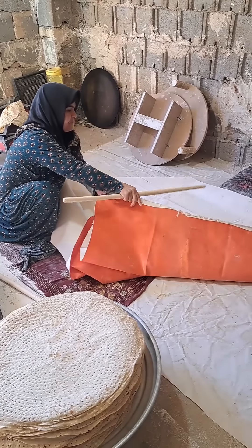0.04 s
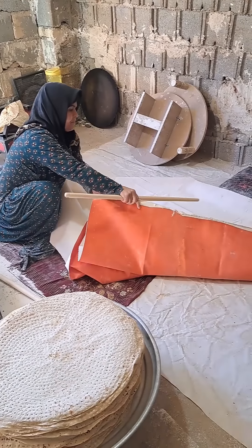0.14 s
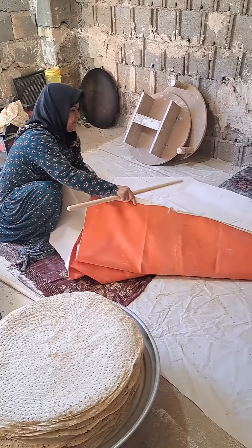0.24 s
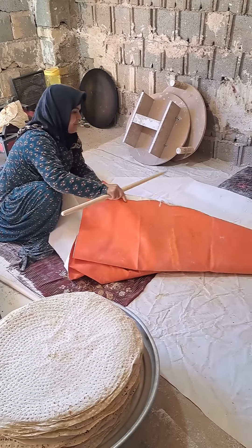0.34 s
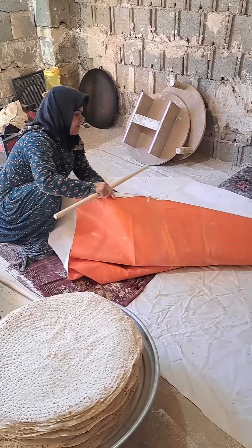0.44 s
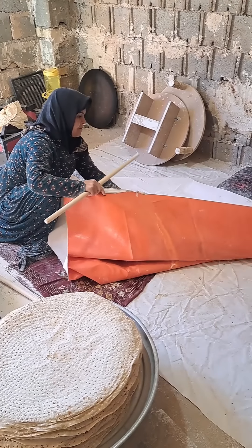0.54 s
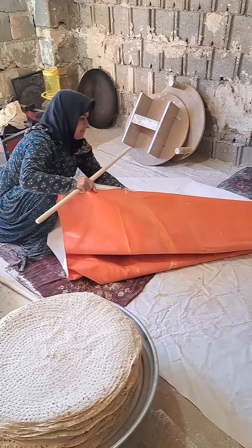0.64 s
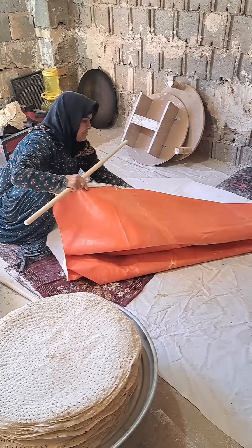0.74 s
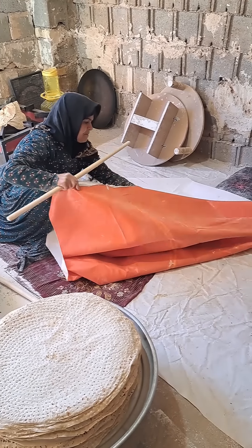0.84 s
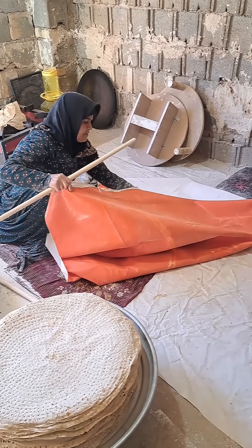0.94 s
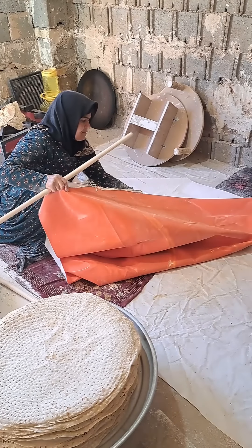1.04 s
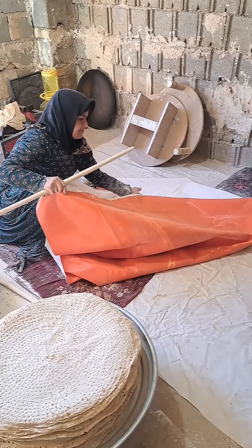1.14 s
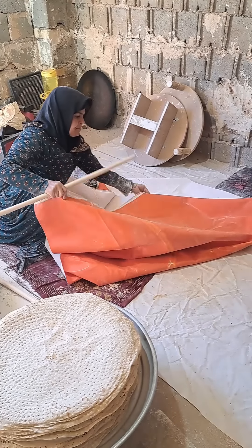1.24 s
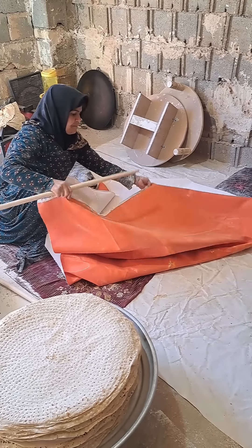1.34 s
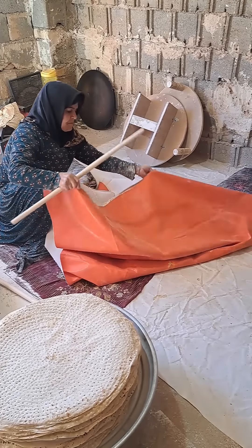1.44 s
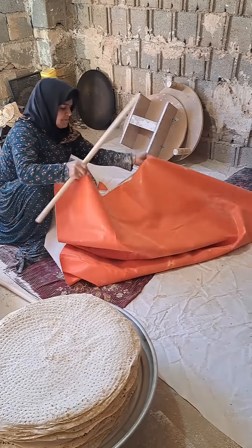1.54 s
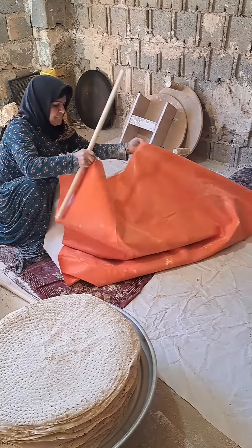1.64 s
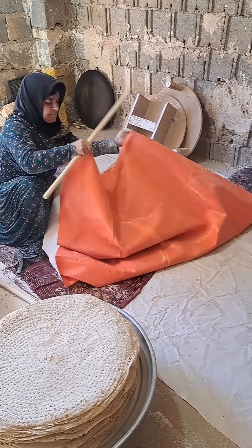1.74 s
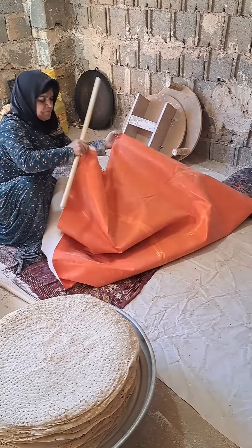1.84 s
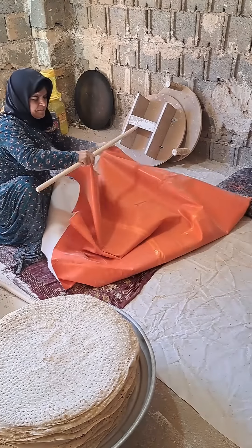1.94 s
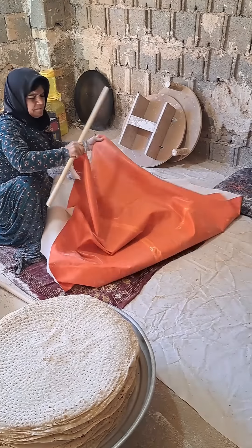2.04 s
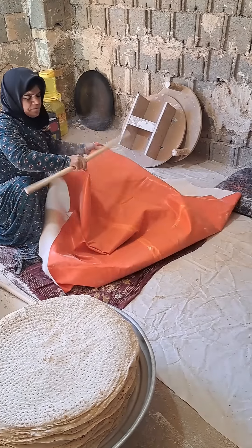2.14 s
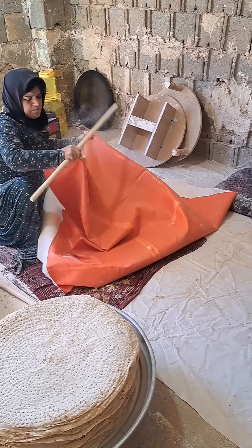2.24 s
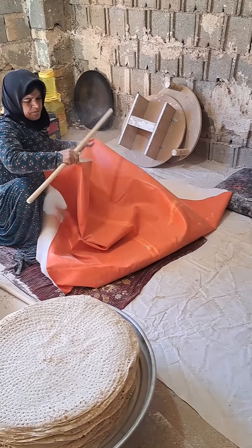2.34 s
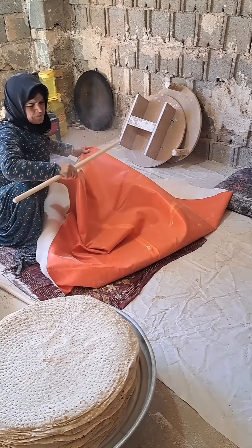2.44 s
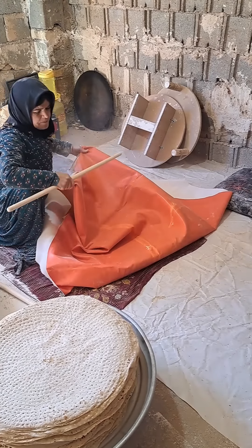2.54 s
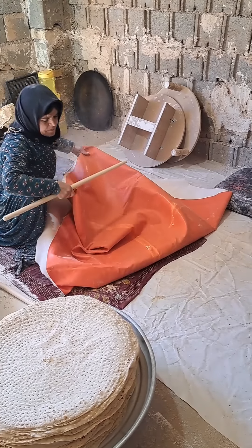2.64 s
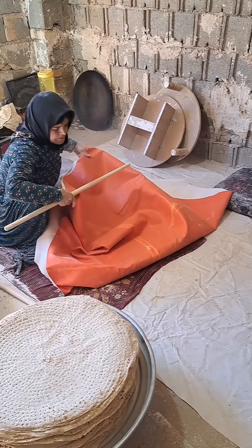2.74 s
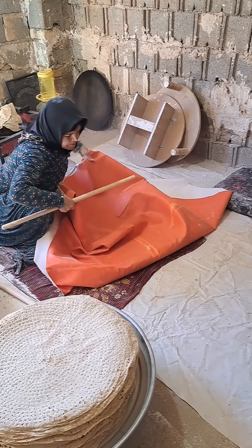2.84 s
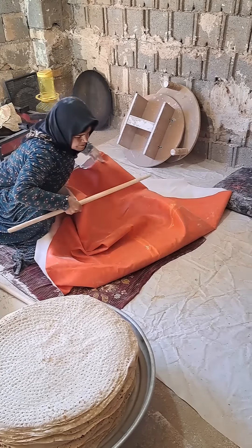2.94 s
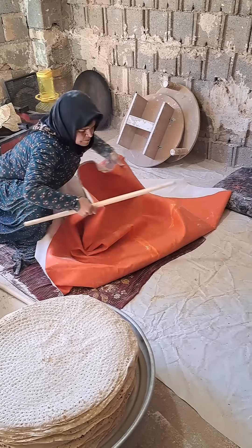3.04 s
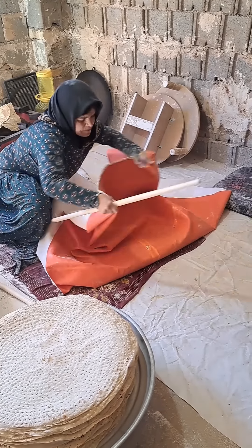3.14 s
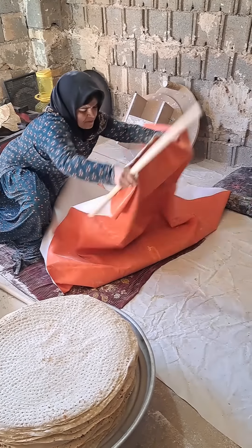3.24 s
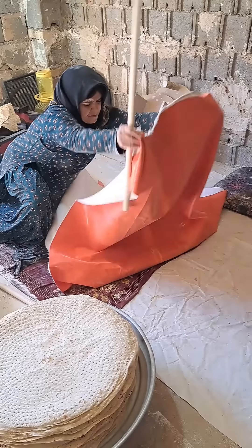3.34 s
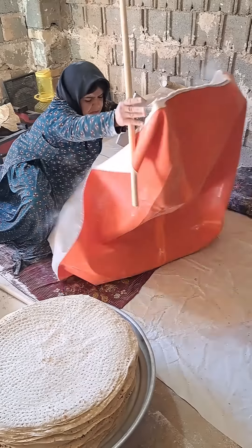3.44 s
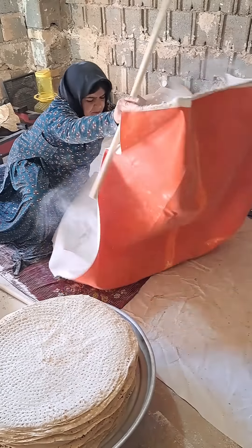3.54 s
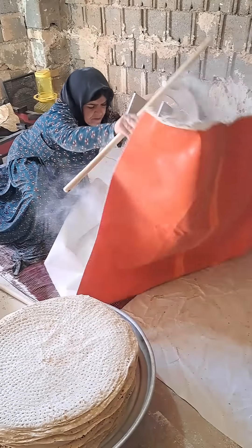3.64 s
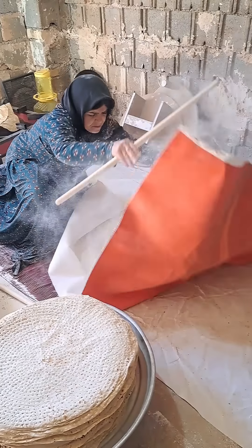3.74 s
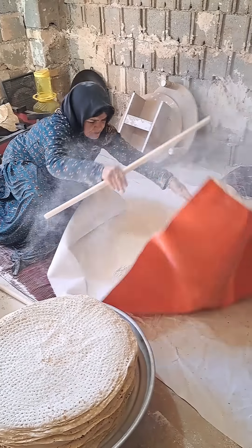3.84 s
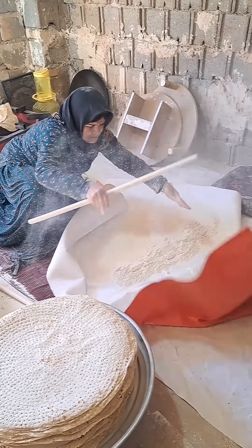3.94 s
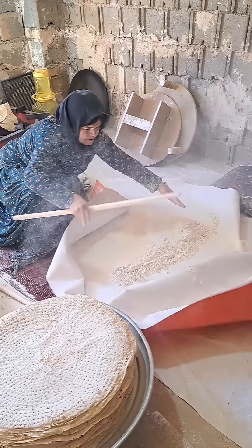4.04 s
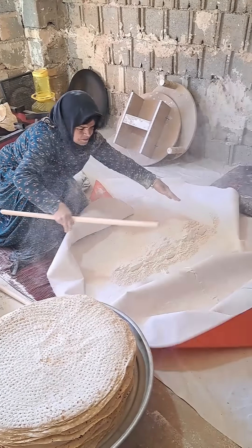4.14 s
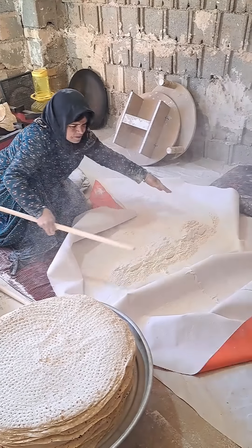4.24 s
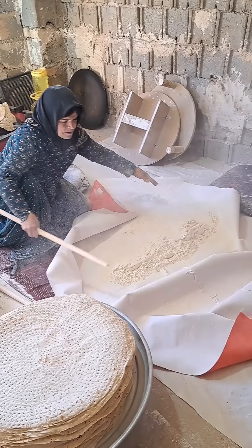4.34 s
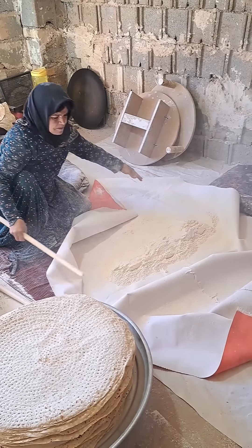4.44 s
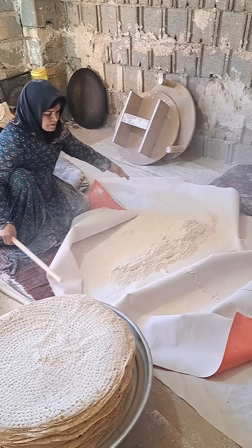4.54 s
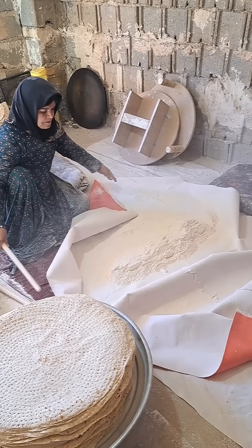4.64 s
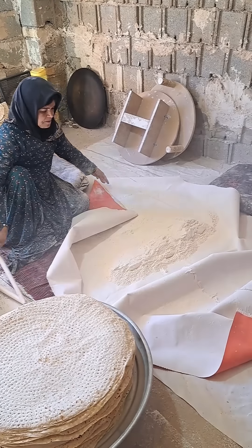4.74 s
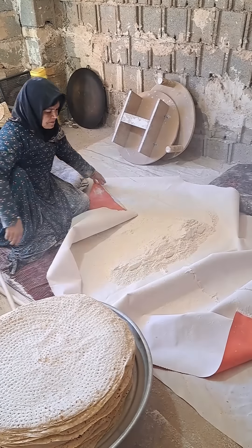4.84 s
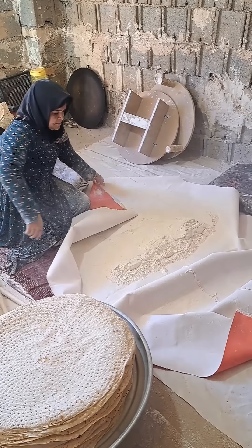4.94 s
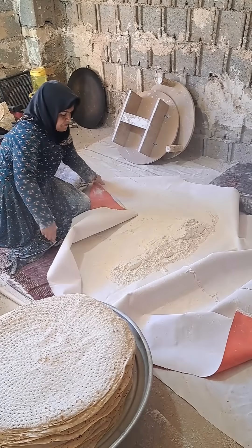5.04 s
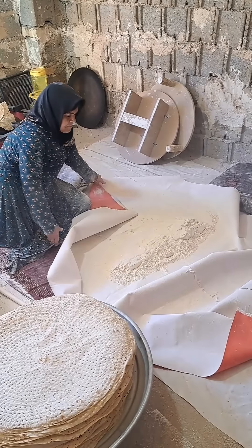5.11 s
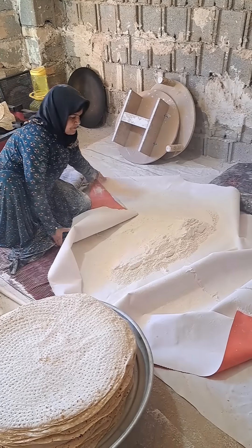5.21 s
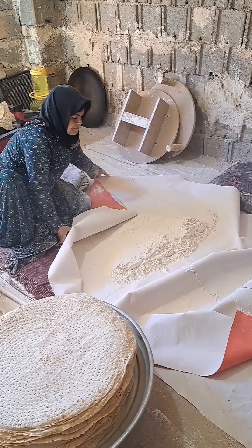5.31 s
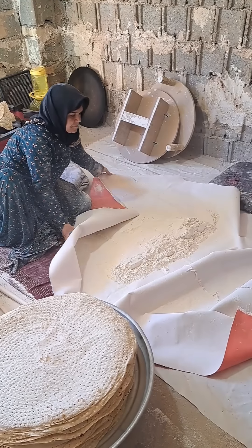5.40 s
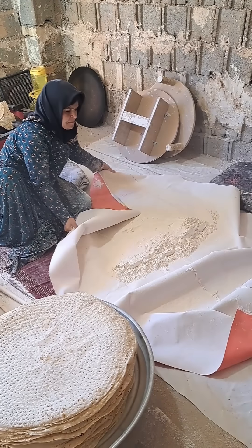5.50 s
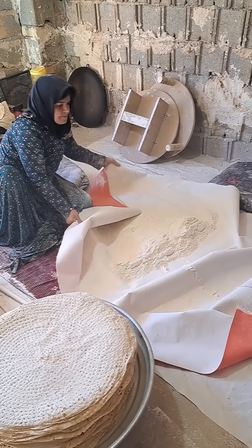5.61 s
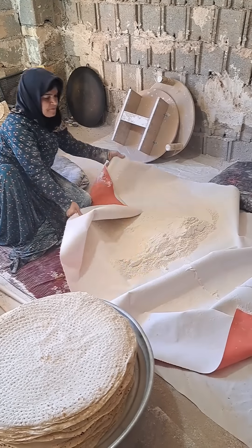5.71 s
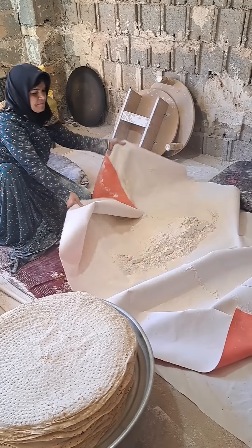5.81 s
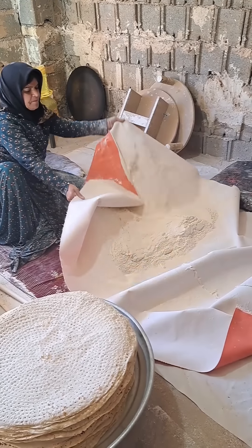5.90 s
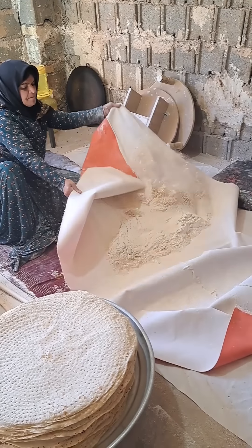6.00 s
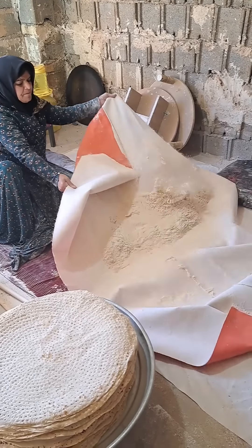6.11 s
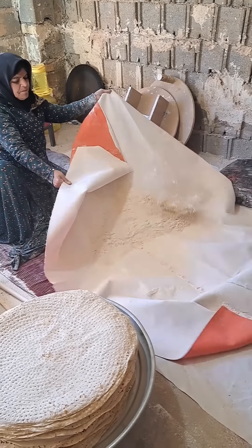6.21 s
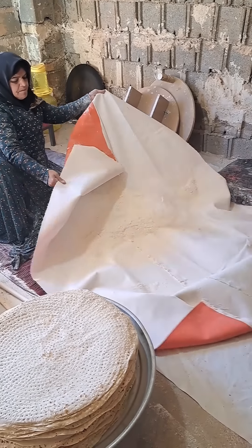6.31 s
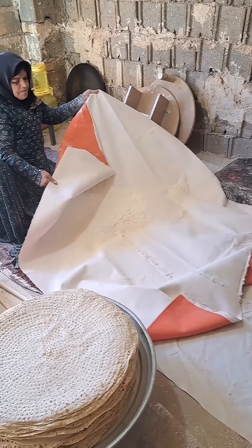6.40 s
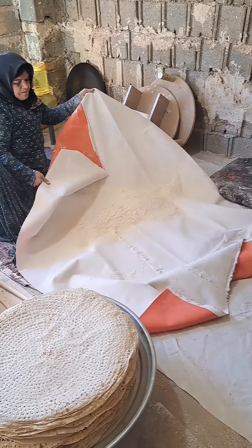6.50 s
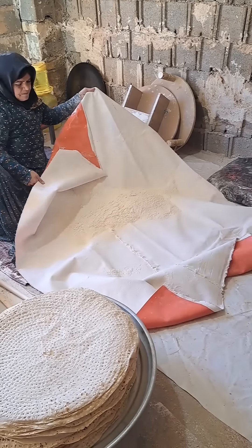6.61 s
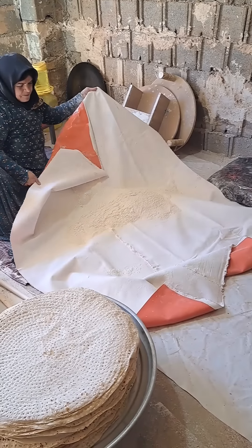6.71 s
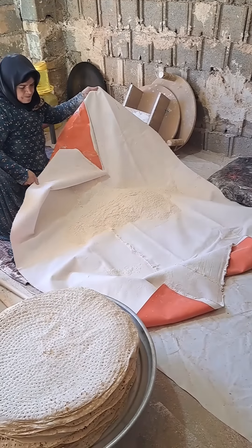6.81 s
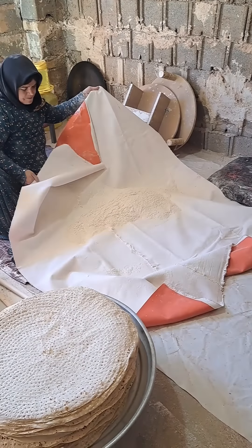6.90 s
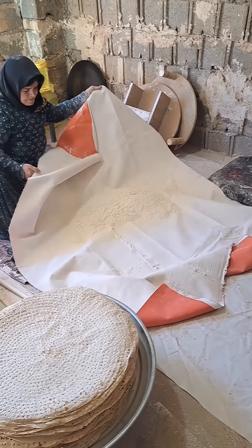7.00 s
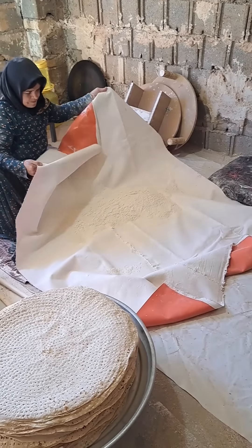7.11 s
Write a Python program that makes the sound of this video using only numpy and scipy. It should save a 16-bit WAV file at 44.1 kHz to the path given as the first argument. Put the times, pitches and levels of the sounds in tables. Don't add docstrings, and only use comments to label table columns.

```python
import sys
import numpy as np
from scipy import signal
from scipy.fft import rfft, irfft, next_fast_len
from scipy.io import wavfile

SR = 44100
rng = np.random.default_rng(int(sys.argv[2]) if len(sys.argv) > 2 else 0)


def put_to_file(sound):
    columns = np.atleast_2d(sound).T
    safe = np.clip(columns, -1, 1)
    whole_steps = np.round(safe * 32767)
    wavfile.write(sys.argv[1], SR, whole_steps.astype(np.int16))


def boost_factor(decibels):
    exponent = np.asarray(decibels, float) / 20
    return 10 ** exponent


N = 315756


def rms_one(x):
    return x / np.sqrt(np.mean(x ** 2) + 1e-20)


def band_pass(order, low_hz, high_hz):
    return signal.butter(order, [low_hz, high_hz], "band", fs=SR, output="sos")


def toward_right(db):
    return boost_factor(np.array([[-db], [db]]))


def at_hz(points, hz):
    table_hz, value = np.transpose(points)
    return np.interp(np.log(hz), np.log(table_hz), value)


def drift(rate):
    r = np.exp(-80 * np.pi * rate / SR)
    noise = rng.standard_normal(N // 40 + 2002)
    return rms_one(signal.lfilter([1], [1, -2 * r, r * r], noise)[2000:])


def wander(db):
    return np.interp(np.arange(N) / 40, np.arange(len(db)), boost_factor(db))


def swells(s, rise, fall, peak_db, roundness):
    age = np.arange(N // 40 + 2)[:, None] * 40 / SR - s
    away = np.where(age < 0, -age / rise, age / fall) ** roundness
    power = np.sum(boost_factor(2 * (peak_db - 10 * away)), axis=1)
    return 10 * np.log10(power + 1e-14)


def ring(clicks, hz, t60):
    r, w = boost_factor(-60 / (t60 * SR)), 2 * np.pi * hz / SR
    return signal.lfilter([0, np.sin(w)], [1, -2 * r * np.cos(w), r * r], clicks + 1e-18)


def grains(per_s, spread_db):
    chance = rng.random((2, 2, N)) * SR / per_s
    size = rng.standard_normal((2, 2, N))
    rarity = np.minimum(-np.log(chance + 1e-9), 2.5)
    return rms_one(size * np.where(chance < 1, boost_factor(spread_db * rarity), 0))


def colour(source, spectrum, patchy_db, rate):
    # pitch in Hz, likeness from 0 to 1.
    likeness = [(60, 0.25), (180, 1), (550, 0.31), (1650, 0.017), (4970, 0.0096), (15000, 0.01)]
    # pitch in Hz, left minus right in dB.
    lean = [(60, 0), (150, -2), (380, -1.5), (950, -2), (2400, -3), (6000, -3.5), (15000, -2.5)]
    out, together = 0, drift(rate)
    edges = 28 * 2 ** np.arange(0, 9.4, 1 / 3)
    for k, (low, high) in enumerate(zip(edges, edges[1:])):
        hz = np.sqrt(low * high)
        if spectrum[0][0] / 1.3 < hz < spectrum[-1][0] * 1.3:
            mid, side = signal.sosfilt(band_pass(2, low, high), source[k % 2])
            alike = np.clip(at_hz(likeness, hz), -1, 1)
            stereo = np.sqrt(1 + alike) * mid + np.sqrt(1 - alike) * side * [[1], [-1]]
            flicker_db = patchy_db * (0.55 * together + drift(rate))
            gain = wander(at_hz(spectrum, hz) + flicker_db)
            out = out + gain * toward_right(-at_hz(lean, hz) / 2) * stereo
    return rms_one(out)


def background():
    # pitch in Hz, level in dB.
    floor = [(18, -39), (30, -13), (280, -0.5), (486, -27), (780, 0), (988, -4), (1220, -11), (1430, 4),
             (1590, -5.5), (2290, -38), (3490, -15.5), (5040, -7), (8980, -11), (12600, -18), (16000, -25)]
    # pitch in Hz, width in Hz, level in dB.
    whistles = [(802, 28, -73), (1115, 25, -75), (1416, 59, -68.5), (3270, 65, -79), (3980, 55, -74),
                (4400, 60, -95), (4820, 37, -74), (5100, 140, -71), (5700, 57, -72), (6060, 60, -75),
                (6310, 26, -75), (6550, 50, -91)]
    out = boost_factor(-61.5) * colour(rng.standard_normal((2, 2, N)), floor, patchy_db=0.6, rate=3)
    jet = rng.standard_normal((2, N))
    for hz, width_hz, level_db in whistles:
        t60 = np.log(1000) / np.pi / width_hz
        out = out + wander(level_db + 1.5 * drift(0.96)) * rms_one(ring(jet, hz, t60))
    notch_hz, sharpness = 3500, 12
    return signal.lfilter(*signal.iirnotch(notch_hz, sharpness, fs=SR), out)


def hand_motion():
    # fastest at in seconds, rise in seconds, fall in seconds, sliding hiss in dB, crease crackle in
    # dB.
    hand_moves = [(.04, 0.34, 0.1, -50.5, -50.5), (.12, 0.056, 0.073, -52, -51), (.32, 0.1, 0.17, -50.5, -47.5),
                  (.44, 0.11, 0.058, -63, -51), (.57, 0.098, 0.054, -61.5, -54), (.77, 0.076, 0.14, -52.5, -51.5),
                  (.95, 0.11, 0.16, -54, -50), (1.21, 0.086, 0.11, -60, -54.5), (1.44, 0.15, 0.073, -60, -57),
                  (1.70, 0.16, 0.12, -60.5, -57.5), (1.82, 0.083, 0.053, -54, -60), (1.96, 0.043, 0.18, -59, -49),
                  (2.08, 0.023, 0.091, -55, -48.5), (2.17, 0.046, 0.094, -55.5, -49),
                  (2.28, .07, 0.058, -58, -49.5), (2.47, 0.13, 0.077, -62.5, -53.5),
                  (2.78, 0.38, 0.23, -69.5, -65),
                  (3.164, 0.061, 0.17, -56, -50.5), (3.36, 0.11, 0.16, -54, -49), (3.45, 0.1, 0.041, -58, -62),
              (3.56, 0.042, 0.078, -67, -71), (3.652, 0.025, 0.071, -55.5, -51.5),
              (3.785, 0.027, 0.059, -39.5, -33), (3.896, 0.014, 0.058, -28, -25.5),
              (4.065, 0.12, 0.055, -59, -50), (4.194, 0.05, 0.07, -49, -50.5),
              (4.256, 0.019, 0.048, -45.5, -47.5), (4.4, 0.16, 0.1, -69.5, -68),
              (4.778, 0.0084, 0.047, -44, -35), (4.88, 0.052, 0.055, -64, -41),
              (5.15, 0.029, 0.16, -51.5, -35.5), (5.21, 0.046, 0.025, -44, -43),
              (5.348, 0.058, 0.076, -51, -38), (5.482, 0.048, 0.12, -56.5, -53),
              (5.7, 0.15, 0.37, -67, -62.5), (5.86, 0.086, 0.071, -64.5, -59.5),
              (6.03, 0.087, 0.36, -51.5, -45.5), (6.64, .1, .05, -47, -56),
              (7.049, 0.2, 0.12, -57.5, -51.5)]
    # time in seconds, hiss level in dB.
    drag = [
        (5.8, -100),
        (5.92, -63.5),
        (6.03, -50),
        (6.24, -32.5),
        (6.4, -31.5),
        (6.52, -34.5),
        (6.65, -44.5),
        (6.79, -74.5),
    ]
    roundness = 1.54
    s, rise, fall, slide_db, crumple_db = np.transpose(np.array(hand_moves))
    drag_db = np.interp(np.arange(N) / SR, *np.transpose(drag), left=-200, right=-200)
    drag_crumple_db = -43 + 0.7 * (drag_db - drag_db.max())
    slide = np.hypot(wander(swells(s, rise, fall, slide_db, roundness)), boost_factor(drag_db))
    crumple = np.hypot(wander(swells(s, rise, fall, crumple_db, roundness)), boost_factor(drag_crumple_db))
    return slide, crumple


def sliding_hiss(slide):
    # pitch in Hz, level in dB per Hz.
    hiss = [(350, -75), (600, -3.5), (768, -7), (1080, -9.5), (1830, -1), (2070, -4.5), (2240, -2),
            (3040, -4.5), (4980, -3), (8050, -7.5), (9110, -9.5), (12200, -10), (16000, -12)]
    return slide * boost_factor(6.0) * colour(grains(14000, 1.6), hiss, patchy_db=0.8, rate=24.0)


def crease_crackle(crumple):
    # pitch in Hz, level in dB per Hz.
    crease = [(420, -3), (600, 3), (1000, -4), (1800, -3), (3000, -10.5), (5000, -25)]
    return crumple * boost_factor(-0.5) * colour(grains(4000, 1.8), crease, patchy_db=3.0, rate=6.3)


def rolling_folds(roll):
    # pitch in Hz, level in dB per Hz.
    fold_colour = [(140, -26), (190, -3), (240, -0.5), (300, 7), (450, -7), (800, -11.5)]
    # pitch in Hz, ring time (60 dB fall) in seconds.
    room_modes = [(237, 0.46), (285, 0.13), (340, 0.054)]
    fold = colour(grains(600, 0.87), fold_colour, patchy_db=4.0, rate=7.6)
    waves = sum(ring(fold, hz, t60) for hz, t60 in room_modes)
    return roll * (fold + 0.1 * rms_one(waves))


def pushed_air(roll):
    # strongest at in seconds, half length in seconds, boom in dB.
    gusts = [(.6, 0.028, -52), (0.796, 0.062, -49), (1.066, 0.089, -57), (1.743, 0.057, -45),
             (2, 0.076, -47), (2.243, 0.057, -36.5), (2.547, 0.19, -60), (3.215, 0.075, -47),
             (3.34, .07, -35.5), (3.53, 0.05, -45), (3.702, 0.061, -42.5), (3.81, 0.12, -42),
             (3.92, 0.061, -37), (4.066, .06, -64), (4.388, 0.13, -41), (4.547, .12, -56),
             (4.78, 0.15, -52), (5.2, 0.11, -48), (5.45, 0.099, -66), (5.952, 0.055, -43),
             (6.336, 0.078, -63), (6.652, 0.063, -78), (7.15, 0.11, -70)]
    s, half, puff_db = np.transpose(gusts)
    still_air_db, air_hz = -72, 60
    puff = wander(swells(s, half, half, puff_db, 1.45)) + boost_factor(still_air_db)
    boom, flutter = rng.standard_normal((2, 1, N)) + 0.14 * rng.standard_normal((2, 2, N))
    boom = rms_one(ring(ring(boom, air_hz, 0.25), air_hz, 0.052))
    flutter = boost_factor(-6) * rms_one(ring(ring(flutter, 112.4, 0.037), 222, 0.061))
    return np.sqrt(roll * puff) * flutter + puff * boost_factor(-4.0) * boom


def sheet():
    # loudest at in seconds, rise in seconds, fall in seconds, rumble in dB.
    rolls = [(.06, .2, 0.13, -50), (.32, 0.11, 0.11, -51.5), (.55, 0.11, 0.099, -52.5),
             (.81, 0.11, 0.056, -50), (.97, 0.1, 0.097, -47.5), (1.28, 0.1, 0.066, -53.5),
             (1.42, 0.043, 0.11, -51.5), (1.755, 0.056, 0.03, -41), (1.83, 0.019, 0.052, -51.5),
             (1.96, 0.036, 0.071, -42), (2.08, 0.034, .1, -49), (2.17, 0.026, 0.078, -43),
             (2.28, 0.087, 0.035, -46.5), (2.43, 0.082, 0.1, -56), (2.82, 0.048, 0.12, -57),
             (3.05, 0.059, .06, -54), (3.2, 0.17, 0.11, -49.5), (3.314, 0.032, 0.09, -33),
             (3.47, 0.055, 0.15, -53.5), (3.652, 0.047, 0.044, -48.5), (3.795, 0.031, 0.19, -38),
             (3.89, 0.059, 0.092, -40), (4.27, 0.14, 0.16, -46.5), (4.785, 0.0069, 0.11, -36),
             (5.14, 0.03, 0.065, -31), (5.348, 0.082, .12, -42.5), (5.49, 0.059, 0.12, -41),
             (5.7, .1, 0.2, -56), (5.96, 0.091, 0.05, -44.5), (6.1, .1, 0.13, -46),
             (6.3, 0.22, 0.31, -41.5), (6.646, 0.13, 0.046, -39)]
    slide, crumple = hand_motion()
    roll = wander(swells(*np.transpose(rolls), 1.3))
    return sliding_hiss(slide) + crease_crackle(crumple) + rolling_folds(roll) + pushed_air(roll)


def near_echoes(x):
    # left delay in ms, right delay in ms, share of the sound sent back.
    echoes = [(1.9, 2.3, 0.025), (3.7, 3.1, -0.11), (6.1, 7.3, 0.17), (11.3, 9.7, 0.17)]
    out = x.copy()
    for *lags_ms, share in echoes:
        lags = np.round(np.array(lags_ms) * SR / 1000).astype(int)
        for side, lag in enumerate(lags):
            out[side, lag:] += share * x[side, :-lag]
    return out / np.sqrt(1 + sum(row[2] ** 2 for row in echoes))


def squeaks():
    # start in seconds, length in seconds, centre in Hz, width in Hz, level in dB.
    rubs = [(0, .17, 1650, 200, -57), (.33, .05, 1500, 120, -57), (1.771, 0.093, 7440, 4000, -45.5),
            (1.892, .05, 12500, 403, -62), (1.91, 0.037, 11200, 300, -63), (2.07, 0.043, 2080, 300, -51),
            (2.075, .04, 12600, 400, -66), (2.144, 0.066, 12500, 500, -53), (3.735, 0.025, 2580, 300, -43),
            (3.759, 0.042, 1700, 400, -30), (4.3, 0.6, 790, 20, -65), (5.95, .75, 370, 220, -45),
            (6.8, .18, 450, 60, -62), (6.82, .2, 712, 50, -60), (6.821, .32, 1400, 1300, -54),
            (6.88, .12, 1080, 70, -59), (6.92, .11, 1425, 60, -58), (7.0, .07, 1650, 50, -62),
            (7.02, .07, 2146, 50, -59), (7.06, .09, 760, 60, -62), (7.07, .08, 430, 50, -57)]
    out = np.zeros((2, N))
    for s, length, hz, width_hz, level_db in rubs:
        swell = np.hanning(round(length * SR))
        band = band_pass(2, hz - width_hz / 2, hz + width_hz / 2)
        noise = signal.sosfilt(band, rng.standard_normal((2, len(swell))))
        out[:, round(s * SR):][:, :len(swell)] += boost_factor(level_db) * swell * rms_one(noise)
    return out


def buckles():
    # start in seconds, peak level in dB, ring pitch in Hz, ring length in cycles.
    snaps = [(.06, -42, 350, 4), (.355, -38.5, 572, 8.4), (.385, -43, 300, 3), (.44, -43, 308, 3.6),
             (.756, -41, 318, 3.6), (1.702, -40, 283, 3.3), (1.734, -26, 296, 3.5),
             (1.991, -34.5, 214, 2.1), (2.067, -33.5, 278, 1.8), (2.198, -37.5, 183, 4.7),
             (3.149, -39.5, 242, 3.6), (3.23, -31, 288, 0.77), (3.284, -29, 227, 1.6),
             (3.316, -11, 313, 0.29), (3.323, -25.5, 194, 3.3), (3.346, -29, 220, 3.6),
             (3.356, -32, 266, 3.4), (3.386, -31.5, 284, 5.1), (3.694, -17, 299, 1.75),
             (3.707, -28, 169, 1.7), (3.715, -30, 288, 3.8), (3.778, -26, 300, 1.7), (3.795, -14, 274, 1),
             (3.807, -27, 259, 2), (3.824, -28, 302, 2), (3.84, -38, 280, 3), (3.874, -19.5, 302, 1.6),
             (3.9, -20.5, 270.5, 4.6), (3.949, -24, 300, 3.4), (4.052, -38, 292, 2.4),
             (4.237, -26.5, 287, 0.23), (5.903, -35, 232, 1.5), (5.915, -38, 237, 1.6)]
    out, age = np.zeros((2, N)), np.arange(6000) / SR
    for s, peak_db, hz, cycles in snaps:
        panel = np.sin(2 * np.pi * hz * age) * np.exp(-age * hz / cycles)
        shiver = signal.sosfilt(band_pass(2, 150, 520), rng.standard_normal(len(age)))
        panel += 0.16 * rms_one(shiver) * np.exp(-age / 0.027)
        out[:, round(s * SR):][:, :len(age)] += boost_factor(peak_db) * panel * toward_right(1.1)
    return out


def cracks():
    # start in seconds, peak level in dB, centre in Hz, decay in ms.
    bursts = [(1.656, -35.5, 2020, 1.3), (1.736, -35, 580, 2.3), (1.929, -36, 1100, 14),
              (2.158, -37.5, 870, 35), (3.128, -40, 1000, 74), (3.165, -37, 2440, 23),
              (3.2985, -17, 1700, 1.0), (3.301, -28, 1200, 8), (3.316, -21, 900, 1.4),
              (3.317, -23.5, 660, 15), (3.619, -44.5, 1500, 75), (3.694, -25, 1140, 5.7),
              (3.731, -35, 4580, 14), (3.772, -21, 2640, 11), (3.777, -19.5, 2800, 3.4),
              (3.871, -31, 2500, 3), (3.874, -18, 1480, 24), (3.88, -13.5, 2000, 3.5),
              (3.8854, -13, 2400, 5.6), (3.902, -19, 2000, 2.6), (4.052, -31, 1100, 5),
              (4.077, -38.5, 2390, 26), (4.761, -17, 2310, 38), (5.123, -29.5, 890, 37),
              (5.304, -46, 2140, 35)]
    out, age = np.zeros((2, N)), np.arange(6000) / SR
    for s, peak_db, hz, decay_ms in bursts:
        noise = rng.standard_normal((2, len(age)))
        noise[:, 0] = 2.5
        leaked = noise + 0.043 * noise[::-1]
        burst = rms_one(signal.sosfilt(band_pass(3, hz / 2, hz * 2), leaked))
        fade = np.exp(-age * 1000 / decay_ms)
        out[:, round(s * SR):][:, :len(age)] += boost_factor(peak_db) / 2 * burst * fade
    return out


def strike(hits, modes, scatter_db):
    s, peak_db, best_hz, fall_db = np.transpose(hits)
    start, span = round(s[0] * SR), SR
    luck = rng.standard_normal((len(hits), len(modes), 4))
    out = np.zeros((2, N))
    for k, (hz, level_db, t60) in enumerate(modes):
        clicks = np.zeros((2, span))
        missed_db = fall_db * abs(np.log2(hz / best_hz))
        strength = boost_factor(peak_db + level_db - missed_db + scatter_db * luck[:, k, :2].T)
        late = 30 * abs(luck[:, k, 0])
        behind = min(round(SR / hz / 4), 8)
        at = np.round(s * SR + late).astype(int) - start
        sign = np.sign(luck[:, k, 2] + 700 / hz)
        clicks[0, at], clicks[1, at + behind] = strength * sign
        out[:, start:start + span] += ring(clicks, hz, t60)
    return out


def dropped_rod():
    # start in seconds, peak level in dB, most excited pitch in Hz,
    # fall in dB per octave away from it.
    free_hits = [
        (4.761, -21.5, 1800, 3.5),
        (4.764, -19, 1550, 1),
        (4.771, -17.5, 3300, 8),
        (4.777, -21.5, 3880, 7),
        (4.789, -23, 900, 17),
        (4.801, -33, 3900, 6),
        (4.806, -32, 1500, 14),
        (4.815, -34, 2100, 10),
        (5.304, -27.5, 2300, 8),
        (5.332, -27, 2200, 16),
    ]
    free_hz = [463, 910, 1465, 1725, 2114, 2190, 2910, 3245, 3652, 4047, 4118, 4680, 4880, 5470]
    # level in dB, ring time (60 dB fall) in seconds.
    free_ring = [(-9, .13), (-6, .14), (6, .05), (3, .035), (2, .055), (-8, .1), (3, .055), (-3, .05),
                 (0, .06), (1, .065), (2, .065), (-3, .045), (-7, .08), (-13, .03)]
    # start in seconds, peak level in dB, most excited pitch in Hz,
    # fall in dB per octave away from it.
    pinned_hits = [(4.8, -30, 1400, 10), (4.83, -33, 1400, 8), (4.854, -30, 1700, 6),
                   (4.866, -32, 1350, 16), (4.888, -36.5, 1900, 16), (4.908, -39, 1940, 14),
                   (5.088, -50, 1320, 17), (5.122, -27.5, 1430, 33), (5.181, -26, 1700, 3),
                   (5.2, -33, 1400, 17), (5.215, -38, 2450, 10), (5.36, -42, 1400, 8)]
    pinned_hz = [1324, 1426, 1933, 2035, 2450, 2530, 3316]
    # level in dB, ring time (60 dB fall) in seconds.
    pinned_ring = [(-1, .16), (3, .19), (-4, .2), (2, .07), (-15, .1), (-15, .12), (-17, .1)]
    free = strike(free_hits, np.column_stack([free_hz, free_ring]), scatter_db=0.5)
    rattle = strike(pinned_hits, np.column_stack([pinned_hz, pinned_ring]), scatter_db=1.5)
    return boost_factor(-3.0) * (free + rattle) * toward_right(1.6)


def thud():
    # start in seconds, peak level in dB, pitch in Hz, swell time in seconds.
    landing = (5.116, -19.5, 233, .014)
    s, peak_db, hz, swell = landing
    age = np.maximum(np.arange(N) / SR - s, 0)
    shape = age / swell * np.exp(1 - age / swell)
    return boost_factor(peak_db) * shape * np.sin(2 * np.pi * hz * age) * toward_right(1.3)


def knocked_board():
    # start in seconds, peak level in dB, most excited pitch in Hz, fall in dB per octave away from it.
    knocks = [
        (5.12, -31, 209, 0),
        (5.19, -35, 300, 10),
        (5.343, -30, 280, 8),
        (5.452, -39, 340, 4),
        (5.475, -41, 500, 10),
        (5.52, -34, 308, 16),
        (5.58, -44, 300, 8),
    ]
    # pitch in Hz, level in dB, ring time (60 dB fall) in seconds.
    board_modes = [(192, -3, 0.55), (226, -2, 0.15), (330, -3, 0.2), (420, -9, 0.12), (570, -2, 0.15),
                   (645, 0, 0.15)]
    board = strike(knocks, board_modes, scatter_db=1.0)
    return signal.sosfilt(signal.butter(2, 900, fs=SR, output="sos"), board) * toward_right(1.5)


def room(x):
    size = next_fast_len(N + SR)
    hz = np.arange(size // 2 + 1) * SR / size
    room_t60_s, wall_cut_hz = 0.17, 5000
    t60 = room_t60_s / np.sqrt(1 + (hz / wall_cut_hz) ** 2)
    out = []
    for side, lags in zip(x, rng.uniform(0.008, 0.04, (2, 10))):
        response = 0
        for k, lag in enumerate(lags):
            one_round = boost_factor(-60 * lag / t60) * np.exp(-2j * np.pi * hz * lag)
            response = response + (-1) ** k * one_round / (1 - one_round)
        out.append(irfft(rfft(side, size) * response, size)[:N])
    return np.array(out)


def scene():
    blows = buckles() + cracks() + dropped_rod() + thud() + knocked_board()
    blows = signal.sosfilt(signal.butter(2, 120, "high", fs=SR, output="sos"), blows)
    return background() + near_echoes(sheet()) + squeaks() + blows + boost_factor(-14.5) * room(blows)


def roll_off(x):
    return signal.sosfilt(signal.butter(12, 15775, fs=SR, output="sos"), x)


def record(dry):
    # pitch in Hz, sharpness, share added.
    mic_peaks = [(9020, 15, -0.41), (12180, 6.7, 0.57), (14200, 5.3, -0.64)]
    x = signal.sosfilt(signal.butter(3, 42, "high", fs=SR, output="sos"), dry)
    x = x + sum(share * signal.lfilter(*signal.iirpeak(hz, q, fs=SR), x) for hz, q, share in mic_peaks)
    top = signal.sosfilt(signal.butter(2, 9500, "high", fs=SR, output="sos"), x)
    mix = x + top * [[0.15], [-0.15]]
    return roll_off(mix)


dry = scene()
out = record(dry)
put_to_file(out)
```